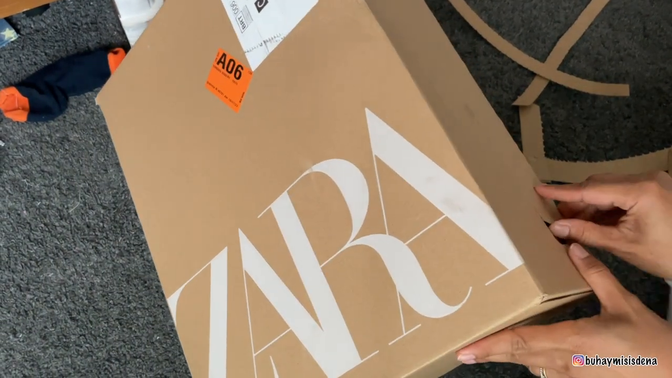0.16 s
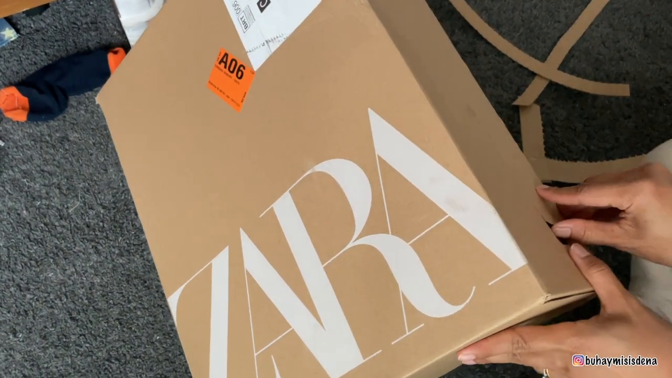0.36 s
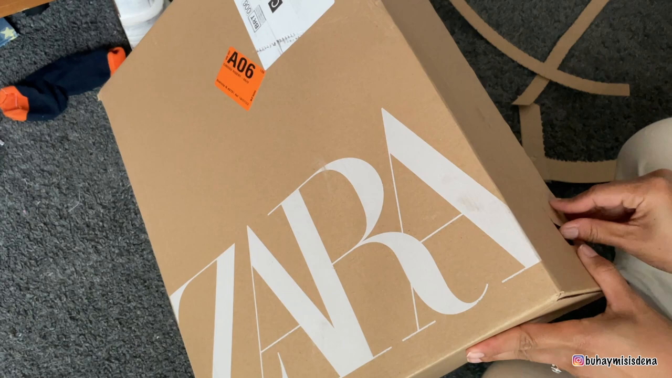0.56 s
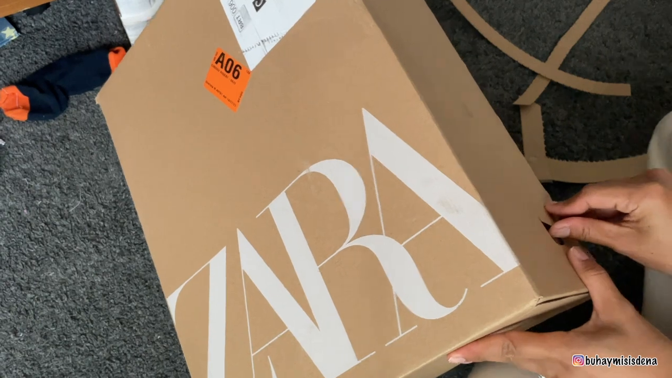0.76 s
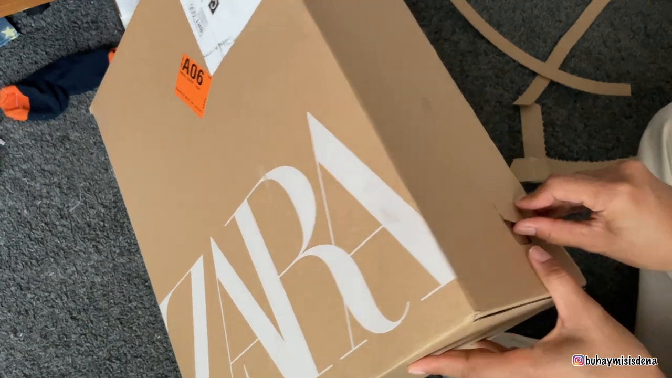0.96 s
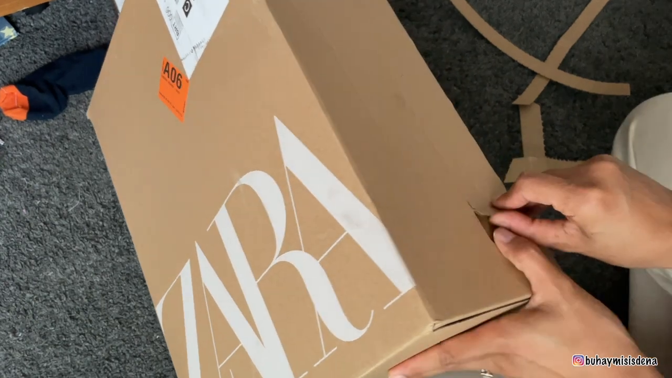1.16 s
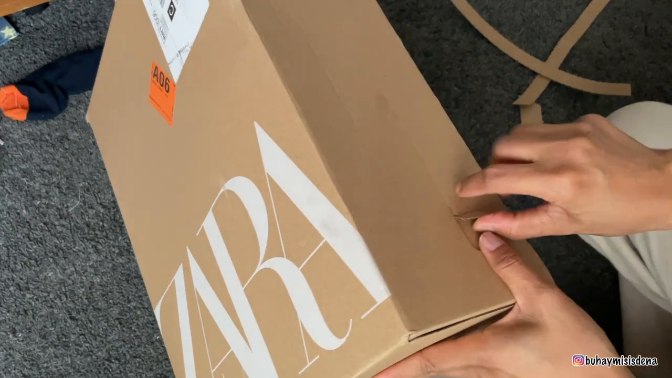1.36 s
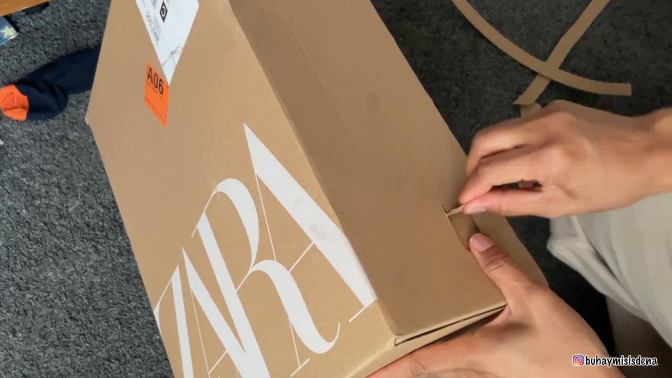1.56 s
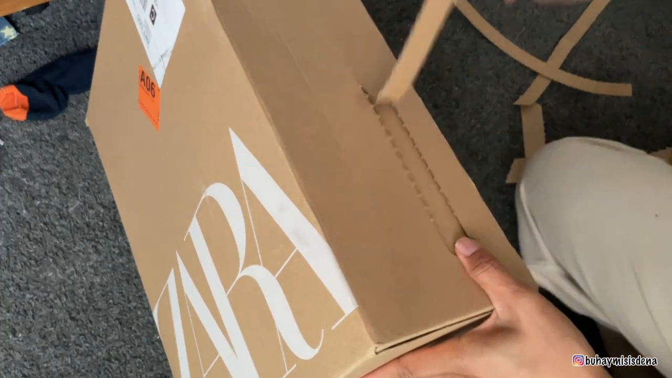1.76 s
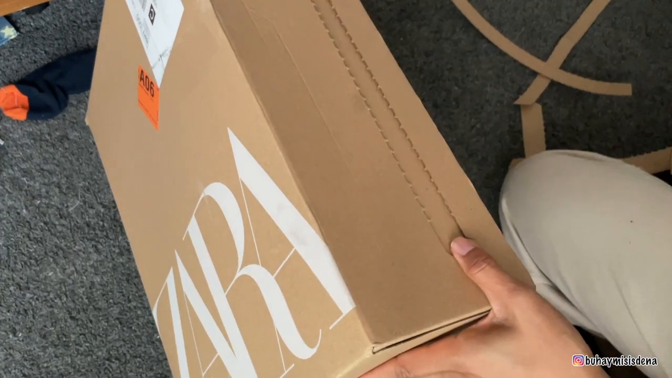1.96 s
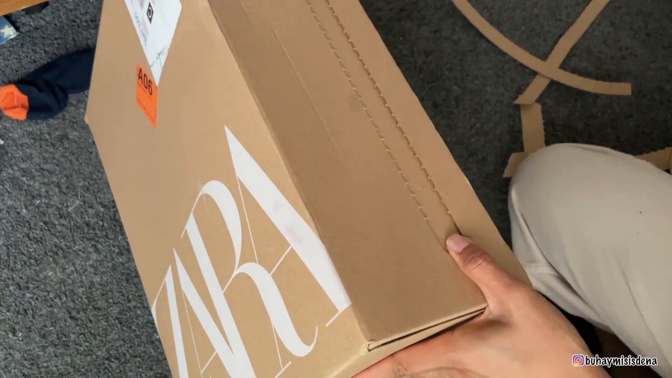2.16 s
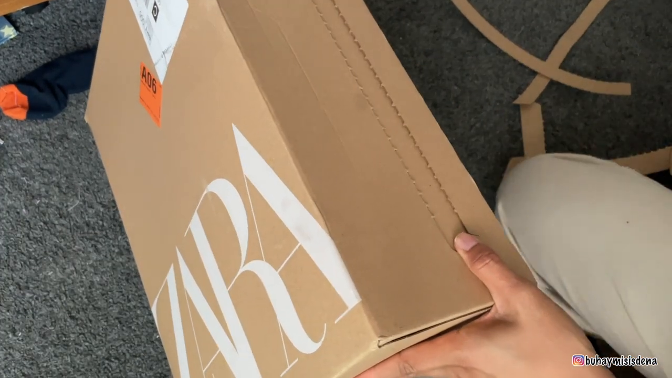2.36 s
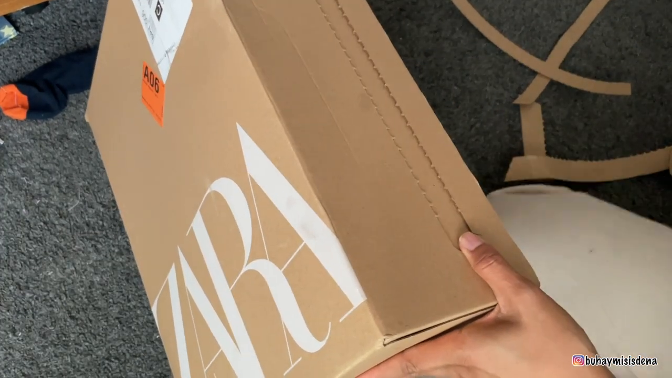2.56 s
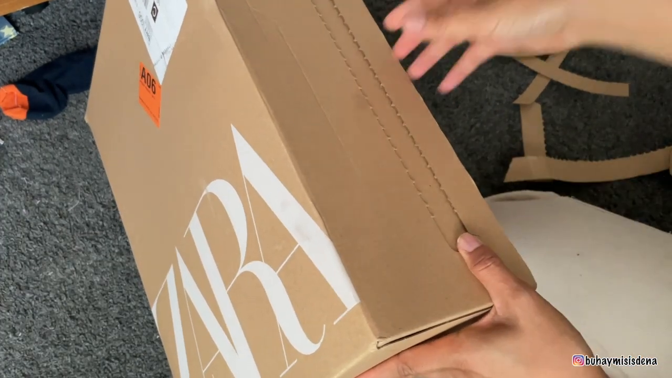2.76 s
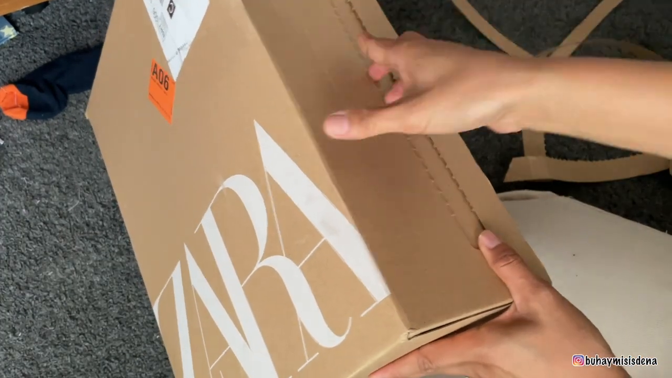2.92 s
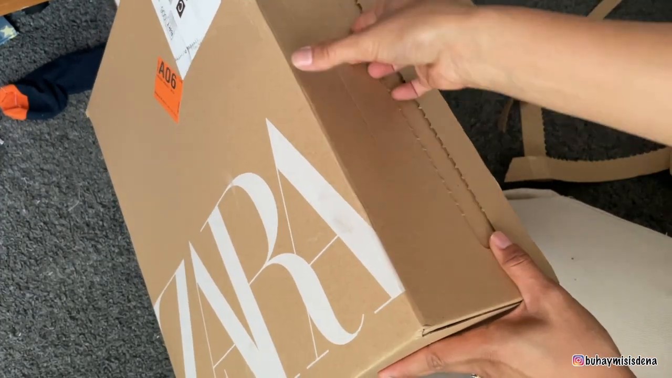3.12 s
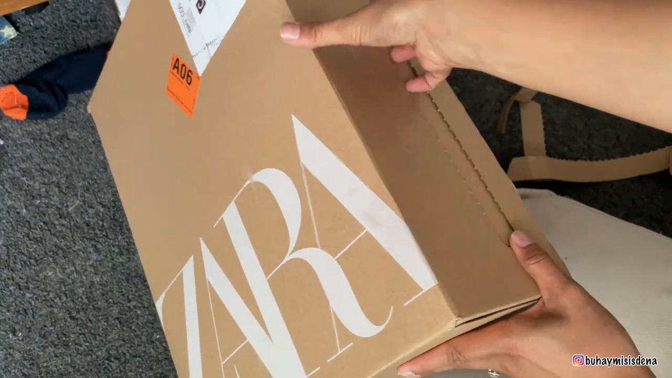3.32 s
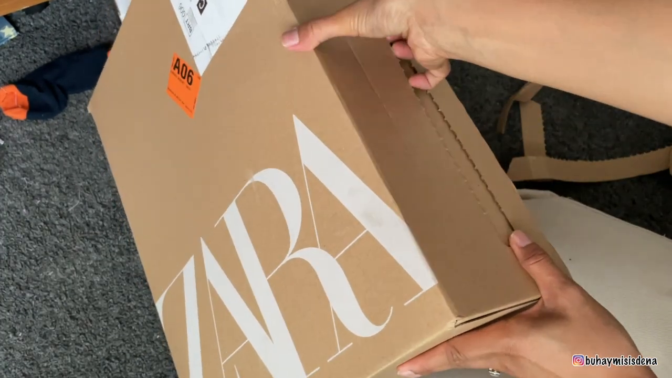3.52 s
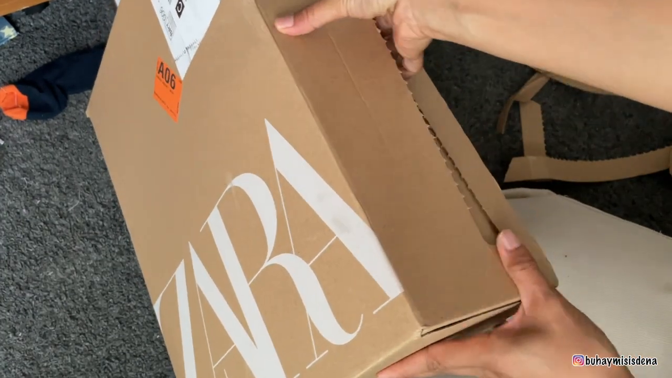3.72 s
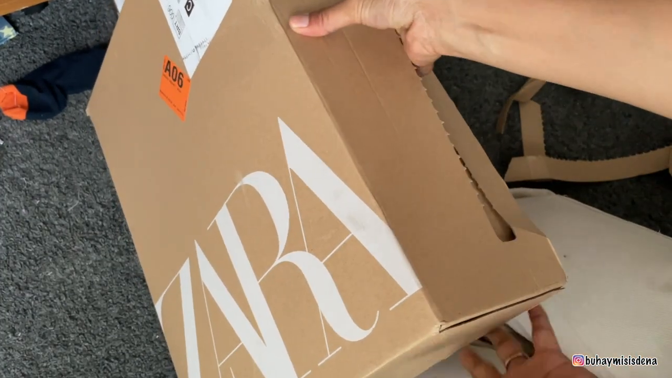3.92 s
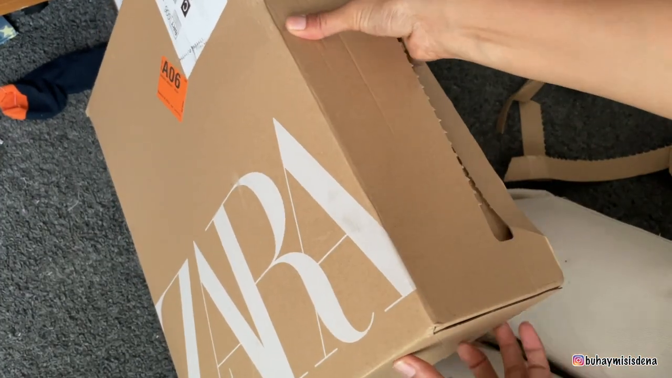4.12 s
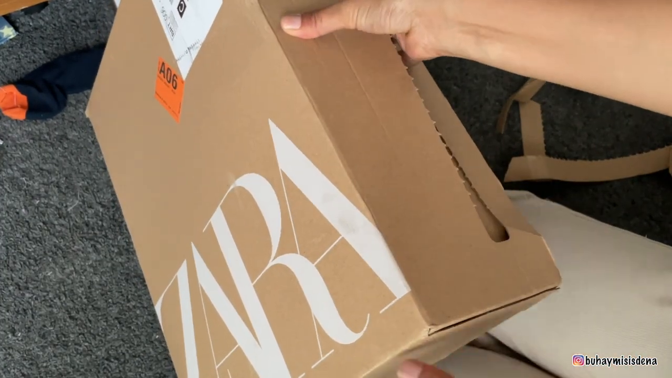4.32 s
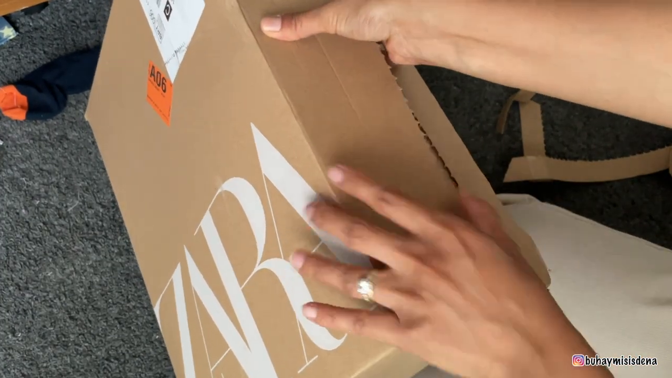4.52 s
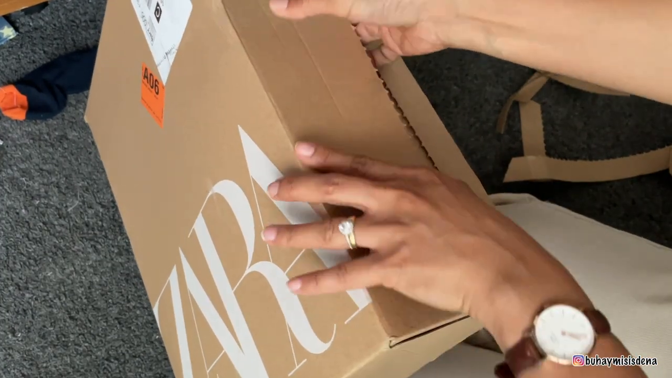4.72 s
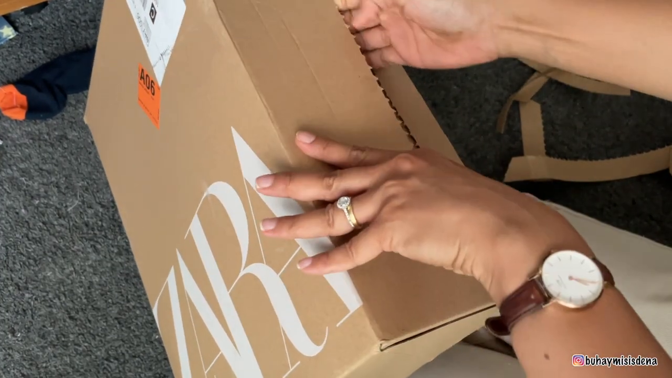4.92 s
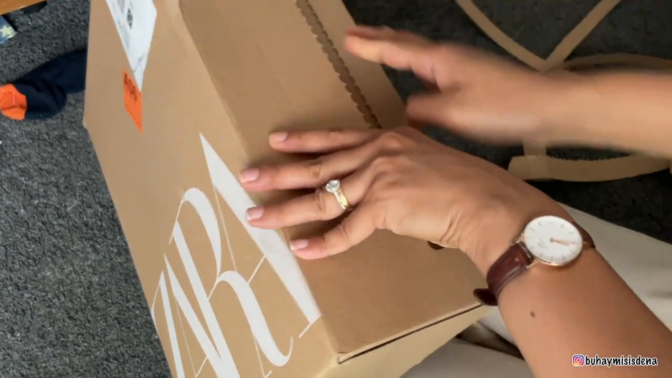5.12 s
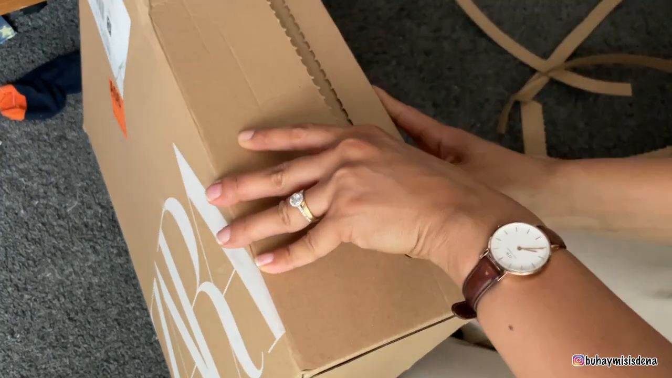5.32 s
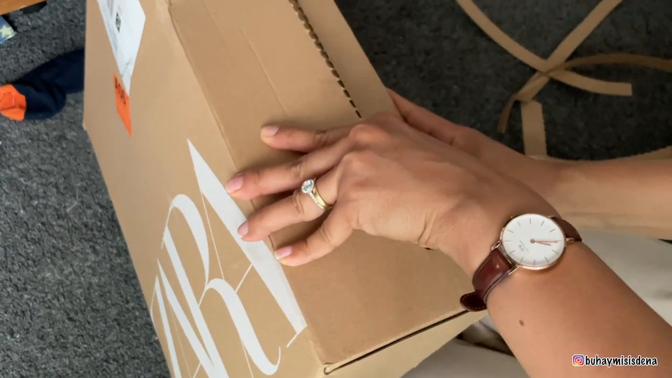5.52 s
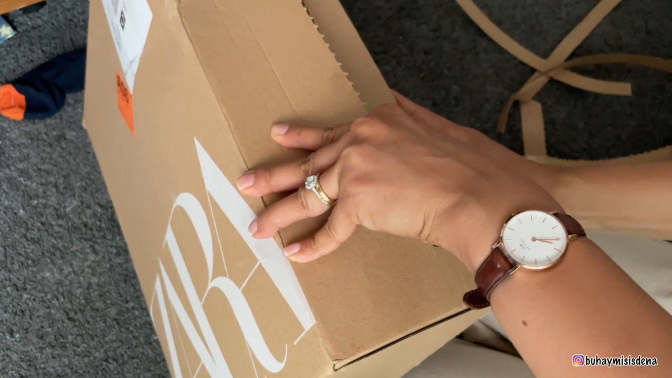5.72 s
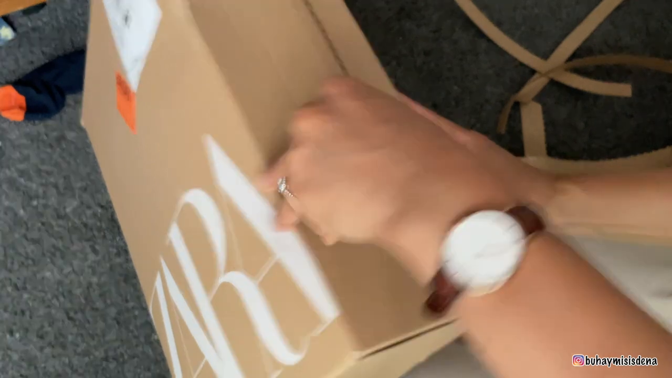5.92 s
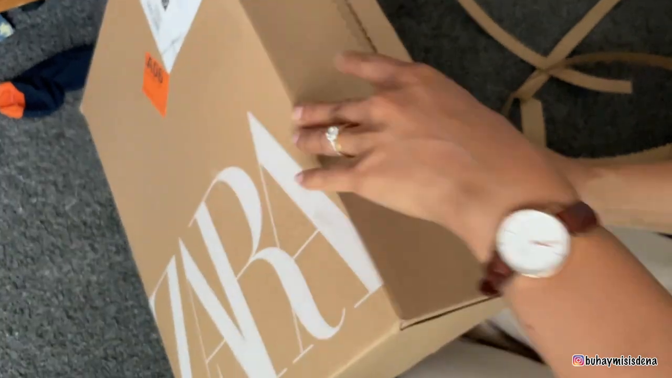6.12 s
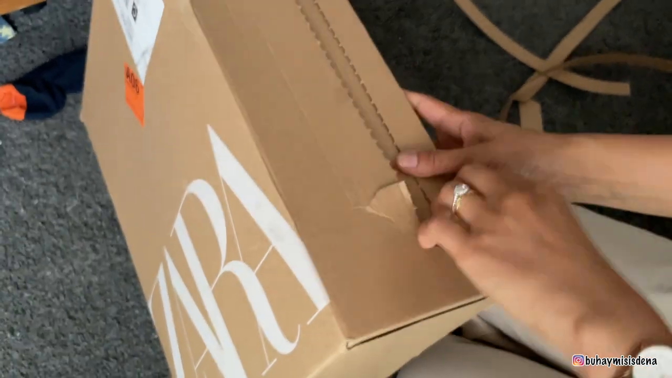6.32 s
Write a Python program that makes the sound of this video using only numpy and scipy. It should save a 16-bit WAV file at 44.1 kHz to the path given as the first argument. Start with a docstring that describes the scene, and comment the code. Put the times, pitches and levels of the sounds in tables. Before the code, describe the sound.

Close in a small quiet room, fingers softly rub and tap a cardboard box with faint squeaks. The tear strip then rips away in a half-second rattling burst. After a short near-silence, hands scrape and pry the lid, panels crunch, a few bright snaps free the corner, and the flap bursts open with hollow, loud knocks.

```python
"""The tear strip of a cardboard box rips through a row of paper bridges in half a second, close by.
Each bridge is a cloud of fibre clicks round a snap, filtered by board resonances, with wall modes and a thud.
Before and after, creases snap, panels buckle, fingers and flaps land and a freed flap rings hollow.
Hands slide, scuff and squeak on the paper as filtered random clicks, in a small room with still air.
Two ports hear early echoes of opposite sign and partly different reverberation; the right one lags."""
import sys
import numpy as np
from scipy import signal
from scipy.fft import rfft, irfft
from scipy.io import wavfile
from scipy.ndimage import uniform_filter1d

SR = 44100
rng = np.random.default_rng(int(sys.argv[2]) if len(sys.argv) > 2 else 0)


def wav_out(sig):
    """Save sig, one row per channel (or a flat mono array), as 16-bit PCM at SR to the path in sys.argv[1]."""
    wavfile.write(sys.argv[1], SR, np.round(np.clip(np.atleast_2d(sig).T, -1, 1) * 32767).astype(np.int16))


N = 281358
TIME = np.arange(N) / SR
ALL_BINS = np.fft.rfftfreq(N, 1 / SR)
SIZE = 8192  # samples in one short sound
AGE = (np.arange(SIZE) - SIZE // 4) / SR  # seconds since the blow
BINS = np.fft.rfftfreq(SIZE, 1 / SR) + 1  # Hz, kept above 0
BLOW_S = .01

# Spectrum of the fibre fizz. Each row: frequency in Hz, relative level in dB.
FIBRE_SPECTRUM = [(1200, -31), (2600, -20), (3700, 2), (4900, -5.5), (5900, 2.5), (8000, 3.5), (11000, 4.5),
                  (16000, 1)]
# Spectrum of rubbing on the paper. Each row: frequency in Hz, relative level in dB.
RUB_SPECTRUM = [(250, -4), (600, 8.5), (1250, 6.5), (2200, 0.5), (3700, -5.5), (5500, -9.5), (9000, -38.5)]


def amp(db):
    """Decibels to gain."""
    return 10 ** (np.asarray(db) / 20)


def evened(x):
    """Scales to rms 1."""
    return x / np.sqrt(np.mean(x ** 2) + 1e-20)


def sized(x, db):
    """Gives a short sound the energy of level db held for BLOW_S."""
    return amp(db) * evened(x) * np.sqrt(BLOW_S * SR / len(x))


def read(points, hz):
    """Reads a table on a log-frequency axis."""
    f, value = np.transpose(points)
    return np.interp(np.log(hz + 1), np.log(f + 1), value)


def coloured(x, spectrum):
    """Shapes a full-length signal by a spectrum, at rms 1."""
    return evened(irfft(rfft(x) * amp(read(spectrum, ALL_BINS)), N))


def smoothed_noise(first_size, second_size):
    """Slow random drift at rms 1: noise through two moving averages."""
    noise = uniform_filter1d(rng.standard_normal(N), size=first_size)
    return evened(uniform_filter1d(noise, size=second_size))


def add(mix, s, sound):
    """Adds a sound on the AGE axis so that its blow falls at s."""
    start = round((s + AGE[0]) * SR)
    part = mix[max(start, 0):start + SIZE]
    part += sound[max(-start, 0):][:len(part)]


def bump(hz, centre_hz, octaves):
    """A bell on the log-frequency axis."""
    return np.exp(-.5 * (np.log2(hz / centre_hz) / octaves) ** 2)


def pair(a, b):
    """Makes two unrelated signals as alike as a diffuse field is at the ports."""
    # Each row: frequency in Hz, likeness of the two ports from 0 to 1.
    likeness = [(30, 0), (100, 0.9), (300, 0.8), (700, 0), (3000, 0.6), (7000, 1), (16000, 1)]
    same = np.clip(read(likeness, ALL_BINS), 0, 1)
    common = rfft(a) * np.sqrt((1 + same) / 2)
    apart = rfft(b) * np.sqrt((1 - same) / 2)
    return irfft(np.array([common + apart, common - apart]), N)


def still_air():
    """Steady noise of the still air, falling towards the treble."""
    # Each row: frequency in Hz, relative level in dB.
    air_spectrum = [(15, 5.5), (30, 6.5), (55, 2.5), (85, 3.5), (130, -6.5), (280, -5.5), (600, -9),
                    (1500, -21.5), (4000, -30.5), (9000, -35.5), (16000, -36.5)]
    sides = [coloured(rng.standard_normal(N), air_spectrum) for side in range(2)]
    return amp(-55) * pair(*sides)


def room(x, onset_s):
    """Dense reflections that build up after the direct sound and die band by band."""
    # Reverberation of the room. Each row: frequency in Hz, t60 in seconds.
    room_t60 = [(80, 0.089), (300, 0.38), (1000, 0.34), (4000, 0.29), (8000, 0.29), (16000, 0.21)]
    hz, t, z = signal.stft(rng.standard_normal((2, SR)), SR, nperseg=256)
    decay = np.exp(-np.log(1000) * t / read(room_t60, hz)[:, None])
    tails = signal.istft(z * decay, SR, nperseg=256)[1]
    tails = tails * (1 - np.exp(-(TIME[:tails.shape[1]] / onset_s) ** 2))
    return pair(*[signal.fftconvolve(x, tail / np.linalg.norm(tail))[:N] for tail in tails])


def nearby(x, decay_s, lo_hz):
    """Early echoes close to the box; their pattern drifts slowly at random between two sets of taps."""
    out = np.zeros(N)
    drift_rad = 4 * smoothed_noise(1500, 1500)
    for weight in (np.cos(drift_rad), np.sin(drift_rad)):
        taps = rng.standard_normal(900) * np.exp(-TIME[:900] / decay_s)
        taps = signal.lfilter(*signal.butter(1, lo_hz, "high", fs=SR), taps)
        out += signal.fftconvolve(x * weight, taps / np.linalg.norm(taps))[:N]
    return out


def grains(per_s, spread_db, count):
    """Fibres letting go at random: many small clicks, a few large."""
    chance = rng.random(count)
    sign = rng.choice([-1, 1], count)
    excess = rng.exponential(1, count)
    return (chance < per_s / SR) * sign * amp(spread_db * np.minimum(excess, 4))


def fracture(before_s, after_s, snap):
    """A cloud of fibre clicks swells and dies round one clean snap, which takes the share snap of the energy."""
    swell_s = np.maximum(np.where(AGE < 0, before_s, after_s), 1e-4)
    cloud = grains(9000, 2.6, count=SIZE) * np.exp(-abs(AGE) / swell_s)
    snap = np.clip(snap, 0, 1)
    return np.sqrt(1 - snap) * evened(cloud) + np.sqrt(snap) * evened(1. * (AGE == 0))


def spot(strength_db, sharpness):
    """Every spot of the board has a few high resonances of its own, so no two snaps share a colour."""
    hz = np.exp(rng.uniform(np.log(1000), np.log(9000), 7))
    return np.prod([1 + amp(strength_db) / (1 + 2j * sharpness * (BINS / f - 1)) for f in hz], axis=0)


def board(force, crack_db, hz, fizz_db, octaves, lag_s):
    """The crack of the board plus the fizz of its fibres; lag_s is the travel time of a 1 kHz bending wave."""
    # Higher board resonances. Each row: frequency in Hz, width in Hz, relative level in dB.
    resonances = [(645.5, 13, 4.5), (799, 34, 0.5), (1176, 31, -6.5), (1221, 100, -10.5), (2520, 200, -24),
                  (3640, 1000, -16.5)]
    ring = 1 + sum(amp(db) / (1 + 2j * (BINS - f) / width) for f, width, db in resonances)
    # bending waves are slower at low pitch, so each snap chirps downward; 1 kHz stays on the blow
    travel = np.exp(-4j * np.pi * lag_s * np.sqrt(1000 * BINS))
    advance = np.exp(2j * np.pi * BINS * lag_s)
    wave = rfft(force) * spot(strength_db=-3.5, sharpness=12) * travel * advance
    crack = irfft(wave * ring * bump(BINS, hz, octaves) / np.sqrt(BINS))
    fizz = irfft(wave * amp(read(FIBRE_SPECTRUM, BINS)))
    return sized(crack, crack_db) + sized(fizz, crack_db + fizz_db)


def mode(hz, t60_s):
    """One damped vibration that starts at the blow."""
    age_s = np.maximum(AGE, 0)
    return np.sin(2 * np.pi * hz * age_s) * np.exp(-np.log(1000) * age_s / t60_s)


def boom(db, centre_hz, octaves, damping):
    """The walls ring; where they are hit and held favours some modes and detunes them a little."""
    # Bending modes. Each row: nominal frequency in Hz, relative level in dB, t60 in seconds at damping 1.
    wall_modes = [(178.7, 4, 0.52), (256.6, 4.5, 0.13), (318, -3.5, 0.18), (368, 0.5, 0.09),
                  (427, 6, 0.084), (496.3, 0, 0.087), (420, -8.5, 0.019)]
    detune = 1 + 0.027 * rng.standard_normal(len(wall_modes))
    luck_db = 3.5 * rng.standard_normal(len(wall_modes))
    ring = np.zeros(SIZE)
    for k, (hz, level_db, t60_s) in enumerate(wall_modes):
        gain = amp(level_db + luck_db[k]) * bump(hz, centre_hz, octaves)
        ring += gain * mode(hz * detune[k], t60_s / damping)
    # a panel radiates little below its lowest modes, and a soft blow excites little above them
    band = signal.butter(3, [185, 620], "band", fs=SR, output="sos")
    return sized(signal.sosfilt(band, ring), db)


def thud(db, nominal_hz, t60_s):
    """The whole box rocks on its trapped air, too slowly to excite anything higher."""
    soft = signal.butter(2, [55, 125], "band", fs=SR, output="sos")
    return sized(signal.sosfilt(soft, mode(nominal_hz * rng.uniform(0.72, 1.7), t60_s)), db)


def ping(force, db, hz, width_hz):
    """Two equal resonances in cascade, each width_hz wide, gather the force into one narrow band."""
    return sized(irfft(rfft(force) / (1 + 2j * (BINS - hz) / width_hz) ** 2), db)


def blow(db, hz, fizz_db, boom_db, boom_hz, thud_db, crumble_s):
    """A crack, the walls' boom and a low thud; the longer the board crumbles, the less clean the snap."""
    force = fracture(before_s=0.78 * crumble_s, after_s=3.0 * crumble_s, snap=np.exp(-crumble_s / 0.0015))
    crack = amp(-1.54) * board(force, db, hz, fizz_db, octaves=0.97, lag_s=0.001967)
    walls = boom(boom_db, boom_hz, octaves=0.54, damping=1.37)
    return crack + walls + thud(thud_db - 5.0, nominal_hz=83, t60_s=0.075)


def wander(x, patchy_db):
    """As the contact point moves over the board, its colour drifts."""
    z = signal.stft(x, SR, nperseg=512)[2]
    patches = rng.standard_normal(z.shape)
    for step in range(2):
        patches = uniform_filter1d(uniform_filter1d(patches, size=5, axis=0), size=9, axis=1)
    return evened(signal.istft(z * amp(patchy_db * evened(patches)), SR, nperseg=512)[1][:N])


def slides():
    """Hands and flaps drag unevenly over the paper, and the walls rumble under them."""
    # One list per spell: finding the tab, prying the lid, lifting the flap. Each row: time in seconds,
    # then relative levels of rubbing, treble and wall rumble in dB.
    spells = [
        [(0.0, -65, -59.5, -62), (0.284, -60.5, -73, -68.5), (0.402, -53.5, -77, -56.5), (0.564, -60, -73, -63),
         (0.66, -52.5, -77, -50.5), (0.786, -56, -97, -68), (1.01, -60.5, -95, -57.5), (1.118, -61.5, -61, -57),
         (1.202, -63, -73, -64.5), (1.472, -55, -63, -56.5), (1.57, -63, -65.5, -53.5)],
        [(2.8, -60, -72, -58), (2.854, -41, -57, -59), (2.964, -56, -63, -46), (3.002, -49, -55, -42.5),
         (3.19, -53, -57.5, -49.5), (3.438, -58.5, -74, -50.5), (3.552, -57.5, -70, -52),
         (3.736, -51.5, -56, -50), (3.866, -63, -67, -51.5), (4.118, -50.5, -63, -53.5),
         (4.45, -68.5, -75, -55.5)],
        [(4.55, -77, -73, -51), (4.604, -51.5, -59, -42), (4.752, -49, -60, -45), (4.96, -46.5, -60, -53),
         (5.138, -51.5, -66, -40.5), (5.28, -61.5, -68, -53.5), (5.528, -51.5, -62, -53),
         (5.756, -50.5, -63, -55.5), (5.984, -40, -61, -40), (6.192, -49.5, -62, -48.5),
         (6.37, -69.5, -91, -59)],
    ]
    # Wall rumble. Each row: frequency in Hz, relative level in dB.
    rumble_spectrum = [(30, -37), (55, 3.5), (85, 2.5), (135, -0.5), (260, -1.5), (440, -3.5), (700, -23.5),
                       (1500, -42)]
    rub_trim_db, hiss_trim_db, rumble_trim_db = 1, 3, 3
    s, rub_db, treble_db, rumble_db = np.vstack(spells).T
    touching = sum((TIME >= part[0][0]) & (TIME <= part[-1][0]) for part in spells)
    grip = amp(2.8 * smoothed_noise(300, 200))
    fibres = grains(6000, 1.3, count=N) * grip
    # sparse random louder clicks roughen the rubbing
    sparse_clicks = evened(grains(380, 6, count=N))
    fibres = evened(evened(fibres) + amp(-6.5) * sparse_clicks)
    scrape = wander(coloured(fibres, RUB_SPECTRUM), patchy_db=1.7)
    rub = scrape * amp(np.interp(TIME, s, rub_db) + rub_trim_db)
    hiss = coloured(fibres, FIBRE_SPECTRUM) * amp(np.interp(TIME, s, treble_db) + hiss_trim_db)
    rumble = coloured(grains(1500, 1.7, count=N) * grip, rumble_spectrum)
    rumble = rumble * amp(np.interp(TIME, s, rumble_db) + rumble_trim_db)
    return (rub + hiss + rumble) * uniform_filter1d(1. * touching, size=600)


def scuffs():
    """A brief drag of a board edge: a longer cloud of clicks with no snap."""
    # Each row: time in seconds, scrape in dB, fibre fizz in dB re scrape, swell scale in seconds.
    drags = [(0.66, -43.5, -25, 0.044), (0.733, -37, -33, .02), (1.01, -56.5, 7, 0.019),
             (1.185, -42, -6, 0.01), (2.365, -63, 3, 0.0094), (2.43, -61, -0.5, 0.0099),
             (3.056, -36.5, -17, .014), (3.187, -46, -7, 0.019), (3.354, -42.5, -8, 0.01),
             (3.617, -31, -1.5, 0.0024), (3.774, -44.5, -9, 0.0029), (3.855, -41, -3.5, 0.018),
             (3.886, -43.5, -2, 0.0043), (4.14, -35.5, 0, 0.005), (4.25, -41, -6, 0.016),
             (4.681, -33.5, -7.5, 0.012), (5.109, -28.5, -12, 0.012), (5.735, -36.5, -7, 0.0048),
             (5.862, -35.5, -10, 0.017)]
    out = np.zeros(N)
    for s, db, fizz_db, swell_s in drags:
        force = fracture(before_s=0.99 * swell_s, after_s=1.5 * swell_s, snap=0)
        scrape = board(force, db, hz=1870, fizz_db=fizz_db, octaves=0.95, lag_s=.001)
        add(out, s, scrape + boom(db - 6, centre_hz=292, octaves=1.0, damping=0.54))
    return out


def squeaks():
    """Skin sticks and slips on the paper; the slips gather in one narrow resonance."""
    # Each row: time in seconds, level in dB, pitch in Hz, swell scale in seconds.
    slips = [(0.341, -49, 1005, 0.018), (0.644, -40.5, 1450, 0.048), (0.867, -47.5, 1235, .009),
             (0.961, -45, 1120, 0.023), (1.213, -42, 1117, 0.0048), (2.553, -47.5, 1330, 0.01),
             (2.866, -33.5, 1110, 0.021)]
    out = np.zeros(N)
    for s, db, hz, swell_s in slips:
        force = fracture(before_s=0.76 * swell_s, after_s=2.3 * swell_s, snap=0)
        scrape = board(force, db - 6.0, hz, fizz_db=-7.5, octaves=0.99, lag_s=.001)
        add(out, s, ping(force, db, hz, width_hz=690) + scrape)
    return out


def ticks():
    """A stiff fibre breaks: nearly all fizz, with a thin ping."""
    # Each row: time in seconds, relative level in dB.
    breaks = [(0.959, -50.5), (1.392, -35.5), (3.75, -48), (4.052, -40.5), (4.084, -56.5), (4.978, -40),
              (5.006, -36)]
    out = np.zeros(N)
    for s, db in breaks:
        force = fracture(before_s=.0004, after_s=0.0019, snap=.6)
        fizz = board(force, db - 10.5, hz=1785, fizz_db=10.5, octaves=.9, lag_s=0.0018)
        add(out, s, fizz + ping(force, db - 6.5, hz=8500, width_hz=970))
    return out


def landings():
    """Fingers and flaps land dully on the box."""
    # Each row: time in seconds, relative crack level in dB, wall boom in dB.
    touches = [(0.389, -58, -48.5), (0.429, -48.5, -45.5), (1.111, -41.5, -34), (1.162, -47, -40),
               (1.41, -44, -43.5), (1.492, -39.5, -36.5), (2.821, -32.5, -31), (2.918, -31.5, -27),
               (4.148, -43.5, -36.5), (4.39, -46, -41), (4.518, -47.5, -40.5), (4.636, -32, -31),
               (5.2354, -44.5, -35), (5.312, -31, -28), (5.332, -31.5, -24.5), (5.9654, -15, -17),
               (5.9746, -16, -9), (6.3623, -27, -23), (6.3735, -32, -35.5)]
    out = np.zeros(N)
    for s, db, boom_db in touches:
        add(out, s, blow(db, hz=1120, fizz_db=-14.5, boom_db=boom_db, boom_hz=320,
                         thud_db=boom_db - 7, crumble_s=.0013))
    return out


def buckles():
    """Panels buckle with a slow crunch as the lid is pried."""
    # Each row: time in seconds, then relative levels of crunch, wall boom and thud in dB.
    bends = [(2.833, -38, -32.5, -20.5), (2.939, -31.5, -34, -26), (3.327, -37.5, -42, -44),
             (3.435, -27, -29, -26), (3.45, -37.5, -25.5, -31), (3.592, -33.5, -22.5, -28),
             (3.625, -44, -32, -23), (3.649, -33, -31, -50), (4.591, -36, -35.5, -37),
             (5.254, -36, -30, -31), (5.949, -15, -24, -13.5)]
    out = np.zeros(N)
    for s, db, boom_db, thud_db in bends:
        add(out, s, blow(db, hz=1350, fizz_db=-11, boom_db=boom_db, boom_hz=326,
                         thud_db=thud_db, crumble_s=0.0055))
    return out


def flap():
    """A free flap springs out of its fold; its few modes stand clear of the walls' boom."""
    # Each row: time in seconds, level in dB.
    pops = [(5.3119, -41), (5.3323, -30), (5.8278, -10.5), (5.9389, -25), (5.9755, -12.5)]
    # Each row: mode frequency in Hz, relative level in dB, t60 in seconds.
    flap_modes = [(364, 0, .075), (760, -4, .02), (860, -3, .02)]
    out = np.zeros(N)
    ring = sum(amp(db) * mode(hz, t60_s) for hz, db, t60_s in flap_modes)
    for s, db in pops:
        add(out, s, sized(ring, db))
    return out


def creases():
    """Creases snap through sharply; a stiffer fold is higher and fizzes more."""
    # Each row: time in seconds, relative crack level in dB, crack centre in Hz, wall boom in dB.
    folds = [(2.793, -44, 1600, -48), (3.1266, -28, 1150, -34), (3.612, -24, 1300, -29),
             (4.573, -36, 1260, -42), (5.453, -34, 1300, -46), (5.4622, -11, 1270, -20.5),
             (5.669, -45.5, 1450, -54), (5.8177, -22.5, 1260, -36), (5.8273, -13, 1270, -23.5),
             (5.9392, -12.5, 1170, -34)]
    out = np.zeros(N)
    for s, db, hz, boom_db in folds:
        fizz_db = -15 + 30 * np.log2(hz / 1300)  # 30 dB per octave
        add(out, s, blow(db, hz, fizz_db, boom_db=boom_db, boom_hz=394, thud_db=db - 24, crumble_s=.001))
    return out


def corner():
    """The lid's last bridges are pulled straight apart: a bright crack and the ping of stiff fibres."""
    # Each row: time in seconds, relative crack level in dB.
    breaks = [(4.818, -27.5), (4.8315, -26), (4.8493, -20.5), (4.8838, -17.5), (4.8984, -23)]
    out = np.zeros(N)
    for s, db in breaks:
        force = fracture(before_s=.0008, after_s=0.00091, snap=0.67)
        crack = blow(db, hz=1700, fizz_db=-6, boom_db=db - 2.5, boom_hz=360,
                     thud_db=db - 16.5, crumble_s=0.0012)
        add(out, s, crack + ping(force, db=-26.5, hz=8830, width_hz=1000))
    return out


def bridge(crack_db, fizz_db, boom_db, boom_hz):
    """One paper bridge stretches, frays and snaps, jerking the box."""
    force = fracture(before_s=0.0032, after_s=0.0012, snap=0.29)
    hz = 1370 * 2 ** (0.51 * rng.standard_normal())
    crack = board(force, crack_db, hz, fizz_db, octaves=1.58, lag_s=0.0008)
    walls = boom(boom_db, boom_hz, octaves=0.56, damping=2.6)
    return crack + walls + thud(crack_db - 12.5, nominal_hz=88, t60_s=0.07)


def tugs():
    """Bridges are tugged through singly, as the strip starts and as it comes off."""
    # Each row: time in seconds, crack in dB, wall boom in dB.
    pulls = [(1.582, -33.5, -35.5), (1.611, -37, -46.5), (1.6285, -22.5, -22), (1.6392, -23, -18.5),
             (1.651, -17.5, -20), (1.6618, -21, -33), (2.0199, -22.5, -18.5), (2.0322, -19, -19),
             (2.043, -20, -16.5)]
    out = np.zeros(N)
    for s, db, boom_db in pulls:
        add(out, s, bridge(db, fizz_db=-7, boom_db=boom_db, boom_hz=310))
    return out


def peel():
    """The strip peels off the liner between bridges, louder as it gathers speed."""
    start_s, end_s, start_db, db_per_s = 1.574, 2.052, -34.5, 36.5
    fibres = grains(3000, 3.2, count=N)
    tearing = coloured(fibres, RUB_SPECTRUM) * amp(-8.5) + coloured(fibres, FIBRE_SPECTRUM) * amp(-14.5)
    pulling = (TIME > start_s) & (TIME < end_s)
    return tearing * pulling * amp(start_db + db_per_s * (TIME - start_s) * pulling)


def run_of_bridges(count):
    """The hand speeds up over evenly spaced bridges, so the gap between them shrinks to a steady one."""
    start_s, first_gap_s, steady_gap_s, speed_up_bridges = 1.6966, .0366, .0195, 2.15
    second_edge_lag, second_edge_db = .22, -4.5  # lag as a share of the gap
    fizz_db, scatter_db = -27, 2.2
    gaps_s = steady_gap_s + (first_gap_s - steady_gap_s) * np.exp(-np.arange(count) / speed_up_bridges)
    ages_s = np.cumsum(gaps_s) - gaps_s
    out = np.zeros(N)
    for age_s, gap_s in zip(ages_s, gaps_s):
        # the faster the tear, the less each bridge is loaded: crack and boom fade, the fizz stays
        crack_db, boom_db = -14 - 22.5 * age_s, -16.5 - 24.5 * age_s
        # a bridge breaks at one edge of the strip, then at the other
        second_lag_s = second_edge_lag * gap_s * rng.uniform(.6, 1.4)
        for lag_s, edge_db in ((0, 0), (second_lag_s, second_edge_db)):
            strength = amp(edge_db + scatter_db * rng.standard_normal())
            snap = bridge(crack_db, fizz_db - crack_db, boom_db, boom_hz=415)
            add(out, start_s + age_s + lag_s, strength * snap)
    return out


def rip():
    """A few tugs, a quickening run of bridges and the last tugs; the liner peels in between."""
    return tugs() + run_of_bridges(count=14) + peel()


def scene():
    """The box, its room and the still air, heard at two ports."""
    # Lag of the right port. Each row: frequency in Hz, phase in radians.
    port_lag = [(20, 0), (1900, 0), (2760, .8), (4130, .7), (4850, 1.7), (5200, -.3), (5700, .4),
                (7500, 1.8), (10000, 3.14), (12500, 4.4), (14700, 6.2), (16500, 6.28)]
    handling = slides() + scuffs() + squeaks()
    hits = ticks() + landings() + buckles() + flap() + creases() + corner()
    tear = rip()
    wet = room(amp(-13.5) * tear + amp(-14.0) * hits + amp(-11.5) * handling, onset_s=0.0013)
    direct = tear + hits + amp(-2.5) * handling
    aside = amp(-19.5) * nearby(direct, decay_s=0.00032, lo_hz=1400)
    left, right = direct + np.array([aside, -aside]) + wet + still_air()
    lagging = irfft(rfft(right) * np.exp(-1j * read(port_lag, ALL_BINS)), N)
    return np.array([left, lagging])


def record(dry):
    """The microphone sheds deep bass and rounds off the loudest peaks; then the band limit."""
    dry = signal.sosfilt(signal.butter(2, 48, "high", fs=SR, output="sos"), dry)
    ceiling = .97
    rounded = dry / (1 + (dry / ceiling) ** 4) ** .25
    lowpass = signal.firwin(511, 16050, window=("kaiser", 9), fs=SR)
    return signal.oaconvolve(rounded, lowpass[None], "same")


dry = scene()
out = record(dry)
wav_out(out)
```